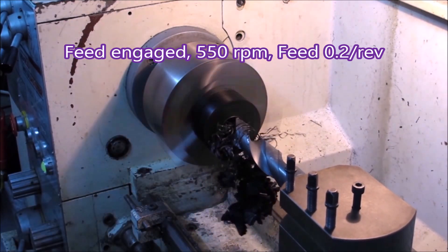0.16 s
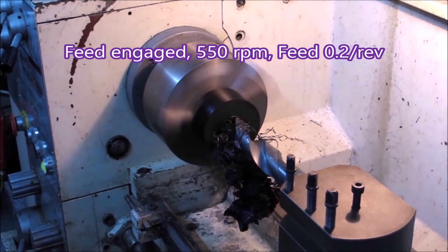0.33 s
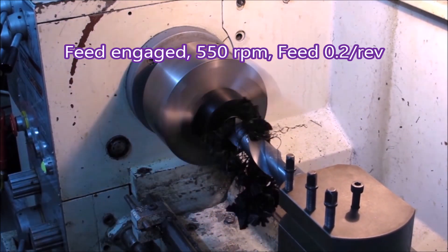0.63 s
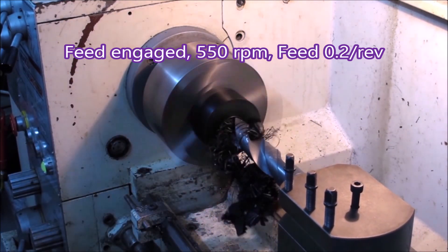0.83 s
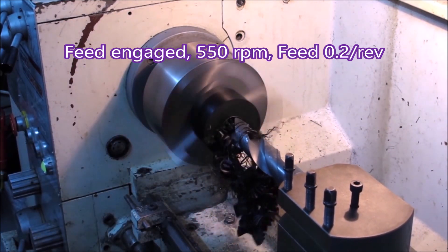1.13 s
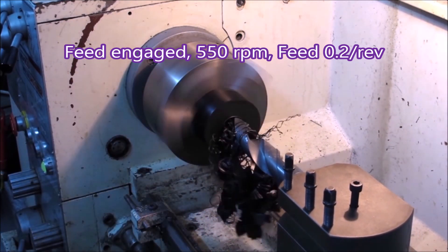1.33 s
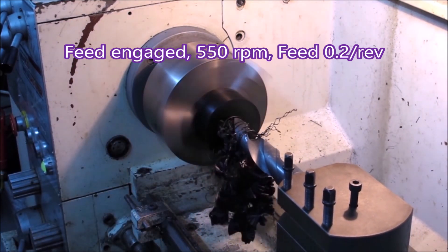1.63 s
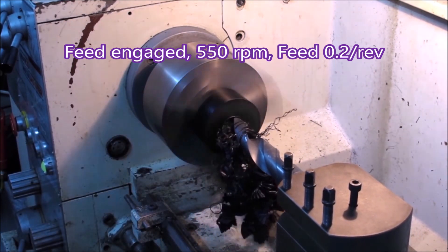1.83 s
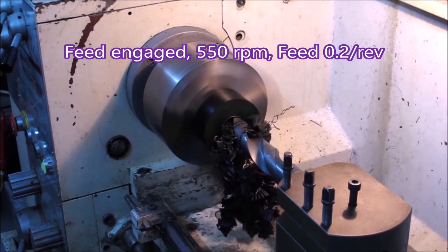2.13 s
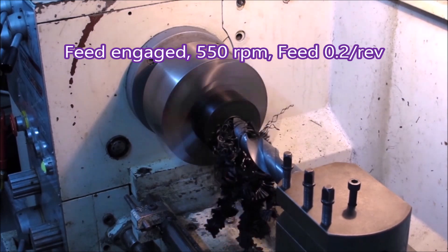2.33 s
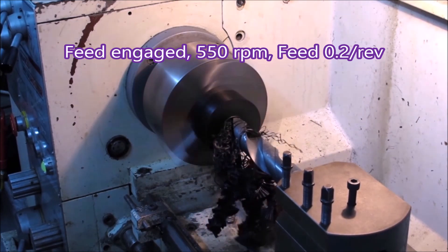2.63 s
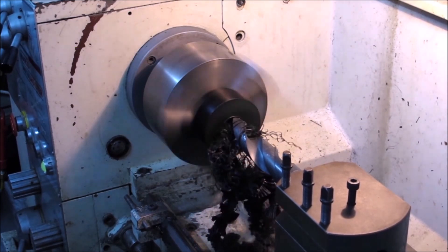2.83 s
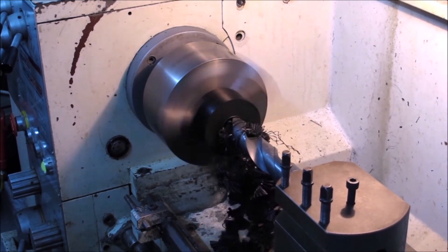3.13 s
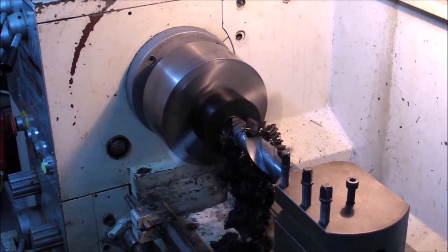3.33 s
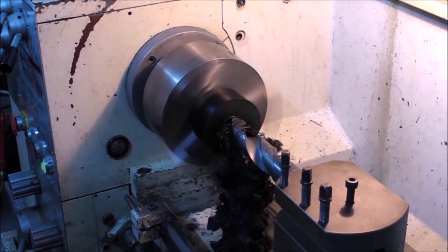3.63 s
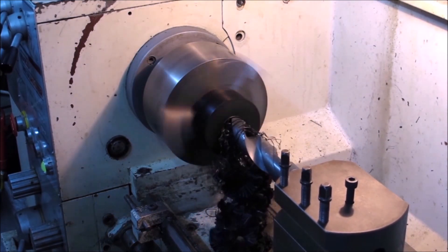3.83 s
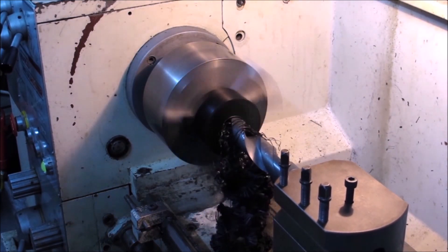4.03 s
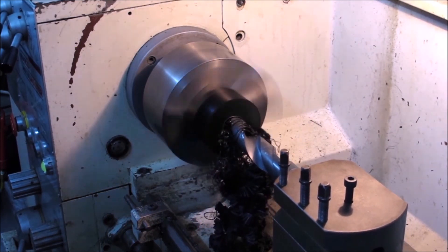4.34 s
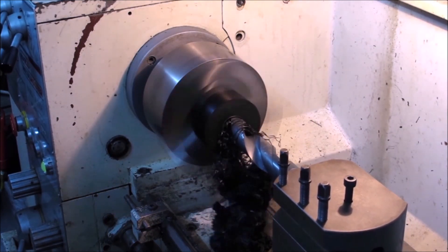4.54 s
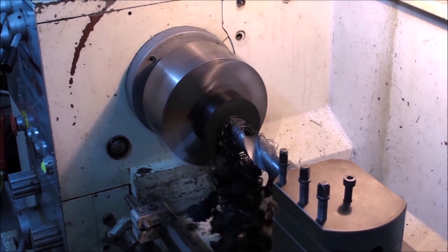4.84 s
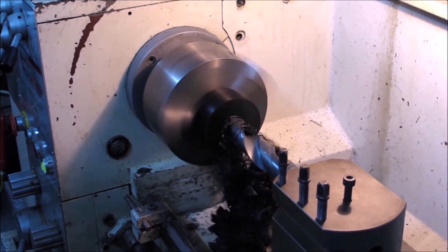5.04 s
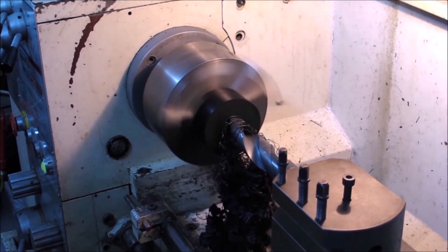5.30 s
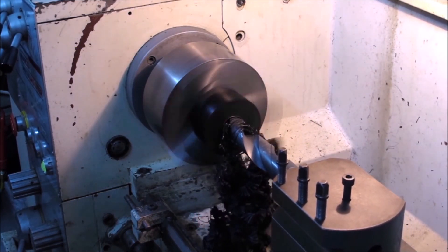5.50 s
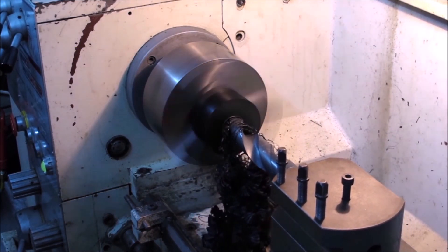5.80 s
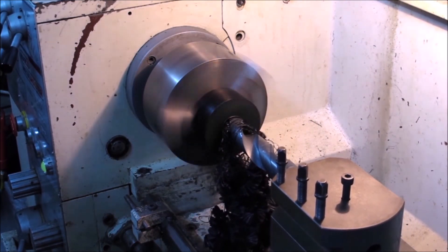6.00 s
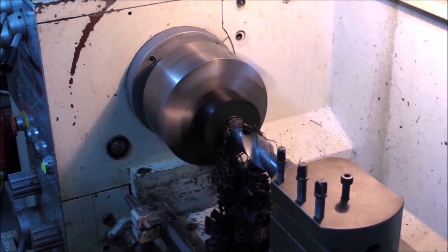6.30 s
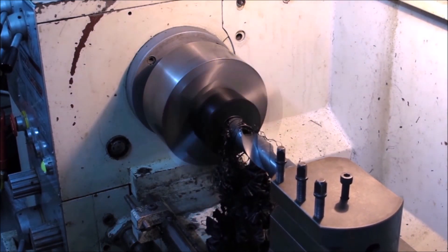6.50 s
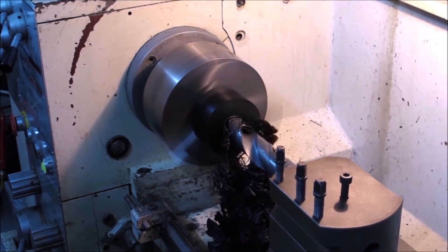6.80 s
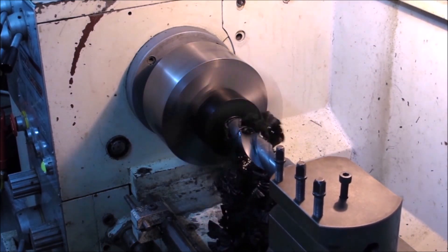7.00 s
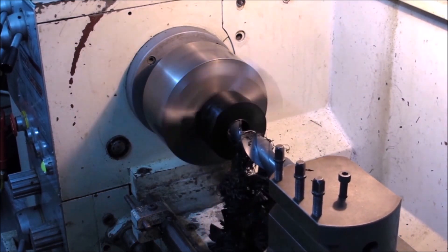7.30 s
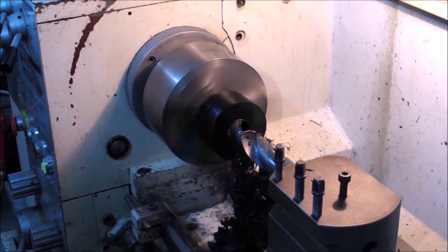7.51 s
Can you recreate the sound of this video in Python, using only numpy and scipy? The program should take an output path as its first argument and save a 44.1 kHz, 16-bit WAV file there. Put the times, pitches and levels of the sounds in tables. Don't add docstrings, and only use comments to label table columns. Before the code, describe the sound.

Close stereo inside a metal lathe cabinet: gears and motor drone steadily while a large drill bites into spinning plastic. A piercing high squeal stutters early, a chip slaps the tool holder, then dense bright hissing and rubbing continues as swarf clogs and clears. Near the end the drill tears through with a rasp and dull thud, cutting stops at once, and light chips tick on sheet metal over free-running gears.

```python
import sys
import numpy as np
from scipy import signal
from scipy.fft import rfft, irfft, next_fast_len
from scipy.io import wavfile
from scipy.ndimage import uniform_filter1d, map_coordinates

SR = 44100
rng = np.random.default_rng(int(sys.argv[2]) if len(sys.argv) > 2 else 0)


def wav_record(signal):
    frames = np.transpose(np.atleast_2d(signal))
    bounded = np.clip(frames, -1, 1)
    quanta = np.round(bounded * 32767).astype(np.int16)
    wavfile.write(sys.argv[1], SR, quanta)


def invert_db(level):
    return 10 ** (np.asarray(level, dtype=float) / 20)


N = 337563
TIME = np.arange(N) / SR

# (time [s], pitch [Hz], level [dB])
SQUEAL = [(0, 5365, -62.5), (.3, 5326, -65), (.5, 5398, -57.5), (.6, 5370, -48.5), (.93, 5363, -39.5),
          (1.5, 5366, -39), (1.6, 5328, -46.5), (2.42, 5382, -49.5), (2.68, 5353, -44.5),
          (3.3, 5389, -54.5), (4.2, 5333, -55.5), (4.75, 5355, -52.5), (6.2, 5369, -64.5),
          (6.6, 5312, -54.5), (6.85, 5261, -54.5), (7.03, 5270, -43), (7.1, 5212, -53.5), (7.24, 5130, -54)]
# (time [s], depth [dB])
SKIPS = [(.63, 11.5), (.69, 35), (.79, 22), (.892, 16.5), (.945, 3), (1, 12), (1.055, 7.5), (1.115, 7.5),
         (1.178, 12), (1.215, 7), (1.242, 12), (1.341, 13.5), (1.372, 4.5), (1.407, 10.5), (1.47, 22),
         (1.492, 10.5), (1.53, 10.5), (1.558, 8)]
# (time [s], rise [dB])
FLARES = [(.04, 9.5), (2.32, 6.5), (2.62, 4), (3, 4), (3.42, 8), (3.85, 3), (4.37, 11.5), (4.72, 7),
          (4.86, 3), (5.53, 8.5), (2.76, 4), (4.15, 4), (6.58, 4), (6.25, 4)]
# (time [s], level [dB])
BITE = [(0, -8), (.45, -6), (.59, 2), (.68, -6), (.82, 0), (1.7, 0), (2.55, 1), (4.3, 1), (5.4, 1.5),
        (6.3, 0.5), (6.77, 2.5), (6.93, 0), (7.16, 4.5), (7.3, 4.5)]
# (time [s], muffling [dB], build-up [s])
CLEARS = [
    (2.3, 5, 0.404),
    (4.05, 4.5, 0.63),
    (4.45, 1.5, 0.11),
    (5.98, 8.5, 0.57),
]
# (time [s], shift [Hz])
TIP_SAG = [(0, 0), (.3, 90), (.42, 0), (.55, -260), (.62, -60), (.8, -220), (.95, 0), (7.3, 0)]
# (centre [Hz], width [Hz], first voice [dB], second voice [dB], left over right [dB])
FLANK_MODES = [(3980, 80, -4, -7, 0), (4300, 300, -12, -3, -1), (4650, 350, -11, -1, -1),
               (5000, 300, -10, -5, -1), (5640, 200, 0, 0, -5), (5900, 400, -4, -6, 0),
               (6400, 500, -9, -10, -1), (7000, 500, -10, -12, 1), (7500, 300, -7, -7, -1)]
LIP_MODES = [(8250, 200, 0, -5, 1), (8600, 250, -6, -6, -1), (9050, 170, -2, 0, 5), (9500, 250, -5, -6, 0)]
MARGIN_MODES = [(10130, 150, -6, -7, 3), (10300, 120, -9, -6, -3), (10670, 150, -2, -5, 4),
                (11180, 150, 0, 0, -5), (11500, 300, -5, -5, -1)]
TIP_MODES = [(11900, 180, -5, -1, -3), (12270, 200, -1, 0, -9), (12480, 150, -2, -6, -11),
             (12700, 220, -1, -3, -8), (12950, 200, -4, -10, -9), (13300, 200, -11, -7, -6),
             (13640, 120, -8, -6, -14), (13930, 200, -8, -3, -13), (14200, 150, 2, -6, -12),
             (14480, 170, -4, -9, -13), (15000, 300, -16, -15, -10), (15500, 500, -40, -19, -11)]
TEAR_MODES = [(1620, 250, -30, -5, 0), (1950, 200, -24, -1, -1), (2500, 600, -16, -6, 0),
              (2950, 250, -9, 1, 0), (3450, 300, -3, 2, 0), (3800, 300, -1, -3, 0), (4200, 250, 0, -2, 0)]
RASP_MODES = [(6470, 1320, -2.5, -6, -0.5), (7590, 510, 12.5, 4.5, -2), (5555, 560, 4, 1.5, -0.5),
              (14840, 820, 5, -12, -16)]
# (centre [Hz], width [Hz], first [dB], second [dB], left over right [dB])
THUD_MODES = [(520, 120, 0, 0, 0), (820, 200, -4, -4, 0), (1150, 400, -6, -6, 0), (330, 100, -8, -8, 0)]
# (time [s], peak [dB], ring [Hz])
SLAPS = [(1.6615, -29, 4200), (1.6635, -32, 3900), (1.667, -27, 3100), (1.669, -34, 4300),
         (1.6715, -37, 2400), (1.686, -37, 4200)]
# (time [s], peak [dB], left over right [dB])
PATTER = [
    (7.2782, -42, -10.5),
    (7.3192, -49, -11),
    (7.384, -54.5, -9.5),
    (7.4504, -44, -8),
]
# (time [s], pitch [Hz], level [dB])
MESH = [(0, 922, -52.5), (.34, 923, -50), (.8, 922, -52), (1.4, 922, -51.5), (2, 922.3, -49.5),
        (2.7, 922, -50.5), (4.2, 921.5, -50), (4.9, 920, -51.5), (6.4, 919.5, -50), (6.92, 909, -57.5),
        (7.03, 904, -62.5), (7.08, 900, -84), (7.2, 930, -75), (7.28, 941, -63), (7.34, 942, -70.5),
        (7.4, 942, -62), (7.65, 943, -61)]
# (pitch [Hz], level [dB])
GEARS = [(662.1, -71), (721.4, -75), (850.6, -74.5), (920.5, -51), (1093, -61.5), (1351, -74), (1550, -73),
         (1637, -77), (1669, -76.5), (1717, -117), (1841, -67.5), (2040, -72.5), (2729, -73.5), (3305, -70),
         (3671, -79.5)]
# (pitch [Hz], level [dB])
HUM = [(199.2, -70), (253.0, -82.5), (398.4, -71.5), (527.6, -75)]
# (time [s], level [dB])
MOTOR = [(0, -58.5), (1.4, -58.5), (2, -56.5), (6.3, -57), (6.9, -61.5), (7.05, -62.5), (7.3, -66),
         (7.65, -62.5)]
# (frequency [Hz], density [dB per Hz])
CABINET = [(15, -66), (25, -26.5), (146, -19.5), (196, -18.5), (311, -19.5), (393, -18), (785, -13),
           (910, -7.5), (1010, -11), (1100, -8.5), (1270, -16.5), (1860, -13), (3280, -18), (3490, -24.5),
           (3800, -18.5), (4940, -78), (8360, -120)]
# (frequency [Hz], density [dB per Hz])
IDLE_AIR = [(1470, -62.5), (2500, -18), (2850, -0.5), (3150, -4), (3670, -10.5), (4540, -10), (6610, -12.5),
            (15600, -12.5)]
# (frequency [Hz], lead [rad])
LEFT_LEAD = [(0, 0), (3800, 0), (4800, -.4), (5350, -.9), (6500, -.1), (7600, -.9), (8270, -1), (8600, .4),
             (9000, -.5), (10000, -1), (11000, -2.6), (12000, -2.3), (12600, -1.8), (13400, -2.4),
             (14100, -1.6), (15300, -2.8)]
# (frequency [Hz], likeness [0-1])
ALIKE = [(30, 0.61), (200, 0.39), (400, 0.49), (1000, 0.36), (3000, 0.55), (6000, 0.29), (15000, 0.7)]

FULL_DB = (-50.5, -50, -48, -44.5)
FOLLOWS_BITE = (0.48, 1.34, 0.445, 0.037)
FEELS_SWARF = (0.23, 1, 0.24, -0.107)
FLARE_S, CLEAR_S = 0.0142, 0.118
BURY_S, BARE_FLANK_DB, BARE_MARGIN_DB = (0.7, 2.5), -6.5, -3
POLISH_S, POLISH_DB = (4.98, 5.02), -3
HUSH_FROM_DB, HUSH_SHARE = -45.5, 0.62
THINNING_S, THIN_TIP_DB = (6.42, 6.66), -3.5
TEAR_S, EXIT_S, STOP_DB_PER_S = (7.05, 7.11), 7.2, 593
RASP_DB, RIP_LEAP_DB = -48.5, 13.5
RIP_DB, RASP_LEAP_DB, RIP_EASES_DB = -56, 8, 3
THUD_S, THUD_DB, THUD_DB_PER_S = (7.1, 7.175), -54.5, 92.5
LINGER_DB, LINGER_DB_PER_S = -15.5, 201
SHAFT_HZ = 50.8
TURN_HZ, RUNOUT_S, RUNOUT_HZ, RUNOUT_DB = 9.17, .995, 12, 1
BITE_IN_S, SEATED_S, DEEP_S, NEAR_END_S = (.45, .7), (1.95, 2.5), (4, 5), (6.1, 7)
AIR_RETURNS_S, AIR_RETURNS_DB = (7.3, 7.6), 3


def cutting():
    places = (FLANK_MODES, LIP_MODES, MARGIN_MODES, TIP_MODES)
    grains_db = (1.59, 1.4, 0.41, 0.25)
    parts = []
    for db, wear, modes, grain_db in zip(rubbing_db(), voices(), places, grains_db):
        level = invert_db(db + 0.677 * wobble(9) + grain_db * wobble(130))
        parts.append(level * ring(modes, np.clip(wear, 0, 1), patchy_db=1.1135))
    *lower, tip = parts
    rub = sum(lower) + shifted(tip, curves(TIP_SAG)[0])
    ripple_db = 0.61 * np.sin(2 * np.pi * 47.0 * TIME) + 0.078 * np.sin(2 * np.pi * 20.0 * TIME)
    ripple_db = ripple_db + 0.146 * wobble(14)
    return rub * invert_db(ripple_db + 0.8 * wobble(400))


def rubbing_db():
    bare = 1 - ramp(*BURY_S)
    hush = np.clip(curves(SQUEAL)[1] - HUSH_FROM_DB, 0, None)
    flank = BARE_FLANK_DB * bare + POLISH_DB * ramp(*POLISH_S)
    lip = 0 * bare
    margin = BARE_MARGIN_DB * bare
    tip = THIN_TIP_DB * (ramp(*THINNING_S) - ramp(*TEAR_S)) - HUSH_SHARE * hush
    shared = np.outer(FOLLOWS_BITE, curves(BITE)[0]) - np.outer(FEELS_SWARF, swarf_db())
    return np.array(FULL_DB)[:, None] + shared + [flank, lip, margin, tip] + freed_db()


def voices():
    bitten, seated, deep, thin = (ramp(*span) for span in (BITE_IN_S, SEATED_S, DEEP_S, NEAR_END_S))
    flank = .04 + .96 * seated - .35 * thin
    lip = 1 - 0.807 * bitten - .25 * seated + .9 * deep
    margin = .1 + .3 * seated + .6 * ramp(SEATED_S[1], DEEP_S[1]) - 0.22 * thin
    tip = 0.077 + 1.5 * bitten - .25 * thin - .03 * swarf_db()
    return [flank, lip, margin, tip]


def swarf_db():
    total = 0
    for s, db, build_s in CLEARS:
        packing = np.exp(np.minimum(TIME - s, 0) / build_s)
        total = total + db * np.where(TIME < s, packing, 1 - ramp(s, s + CLEAR_S))
    return total


def freed_db(linger_db=-60):
    after = np.clip(TIME - EXIT_S, 0, None)
    return np.maximum(-STOP_DB_PER_S * after, linger_db - LINGER_DB_PER_S * after)


def squeal():
    hz, db = curves(SQUEAL)
    late = np.clip((TIME - 6.45) / .4, 0, 1)
    ragged = np.where((TIME > .55) & (TIME < 1.55), .04, .36 - .2 * late)
    skips = sum(depth_db * np.exp(-((TIME - s) / 0.00557) ** 2) for s, depth_db in SKIPS)
    flares = sum(rise_db * np.exp(-((TIME - s) / FLARE_S) ** 2) for s, rise_db in FLARES)
    chance = unit(wobble(70)) + 1j * unit(wobble(70)) + .5 * (wobble(200) + 1j * wobble(200))
    shaft = 2 * np.pi * SHAFT_HZ * TIME
    shake_db = (.9 + 5 * ragged + 2.5 * late) * np.sin(shaft)
    turn = 2 * np.pi * TURN_HZ * (TIME - RUNOUT_S)
    runout = np.cos(turn) + .5 * np.cos(2 * turn)
    hz = hz + RUNOUT_HZ * runout + 60 * late * np.cos(shaft)
    song = tone(hz, rough_db=-0.09, drift_hz=4)
    song = song * (np.sqrt(1 - ragged) + np.sqrt(ragged / 2) * chance)
    song = song * invert_db(db + flares - skips + freed_db() + shake_db - RUNOUT_DB * runout)
    left = invert_db(-0.22) * (song * np.exp(-.45j)).real
    right = invert_db(2.5) * (song * np.exp(.45j)).real
    return np.array([left, right])


def breakthrough():
    thin, torn = ramp(*THINNING_S), ramp(*TEAR_S)
    thud_fall_db = THUD_DB_PER_S * np.clip(TIME - THUD_S[1], 0, None)
    thud = ramp(*THUD_S) ** 2 * invert_db(THUD_DB - thud_fall_db)
    rip = thin * invert_db(RIP_DB + RIP_LEAP_DB * torn + freed_db(LINGER_DB))
    rip = rip * invert_db(-RIP_EASES_DB * ramp(TEAR_S[1], EXIT_S))
    rasp = thin * invert_db(RASP_DB + RASP_LEAP_DB * torn + freed_db(2 * LINGER_DB))
    opened = np.clip((TIME - 7.07) / .08, 0, 1)
    out = np.zeros((2, N))
    for gain, modes in zip((thud, rip, rasp), (THUD_MODES, TEAR_MODES, RASP_MODES)):
        out += gain * invert_db(2.08 * wobble(120)) * ring(modes, opened, patchy_db=-0.5, skirt=1.19)
    return out


def chips():
    slaps, t = np.zeros((2, N)), np.arange(SR // 8) / SR
    for s, db, hz in SLAPS:
        slap = invert_db(db - 60 * t / 0.00395) * np.sin(2 * np.pi * hz * t)
        slaps[:, round(s * SR):][:, :len(t)] += slap
    patter = np.zeros((2, N))
    for s, db, pan_db in PATTER:
        after = np.clip(TIME - s, 0, None)
        sides_db = np.array([[pan_db / 2], [-pan_db / 2]])
        patter += invert_db(db - 16.5 - 60 * after / 0.124 + sides_db) * (TIME >= s)
    sheet = [(6000, -31.5), (9500, -7), (13000, 8.5), (16000, 0)]  # (frequency [Hz], density [dB per Hz])
    return slaps + patter * rush(lambda hz: invert_db(along(sheet, hz)), patchy_db=-0.5)


def machine():
    mesh_hz, mesh_db = curves(MESH)
    main_hz, main_db = max(GEARS, key=lambda row: row[1])
    gears = np.zeros(N)
    for hz, db in GEARS:
        under_db = db - main_db
        rough_db = 0.117 - 0.1053 * under_db
        gears += invert_db(under_db) * tone(mesh_hz * hz / main_hz, rough_db, drift_hz=hz / 700).real
    hum = sum(invert_db(db + 56) * tone(hz, rough_db=1.0, drift_hz=0.423).real for hz, db in HUM)
    rumble = rush(lambda hz: invert_db(along(CABINET, hz)), patchy_db=1.5)
    motor = invert_db(curves(MOTOR)[0]) * (invert_db([[-1.4], [1.4]]) * hum + rumble)
    air = rush(lambda hz: invert_db(along(IDLE_AIR, hz)), patchy_db=4.0)
    air = invert_db(-65 + AIR_RETURNS_DB * ramp(*AIR_RETURNS_S)) * air
    return invert_db([[-.6], [.6]]) * invert_db(mesh_db) * gears + motor + air


def ring(modes, depth, patchy_db, skirt=1.297):
    centre, width, first_db, second_db, pan_db = np.transpose(modes)
    level = invert_db(np.array([first_db, second_db])[:, None] + np.outer([.5, -.5], pan_db))

    def gain(hz):
        detune = 2 * (hz - centre[:, None]) / width[:, None]
        return np.sqrt(level ** 2 @ (1 + detune ** 2) ** -skirt)

    first, second = rush(gain, patchy_db)
    return (1 - depth) * first + depth * second


def rush(gain, patchy_db):
    z = signal.stft(rng.standard_normal((2, N)), nperseg=512)[2]
    field = uniform_filter1d(rng.standard_normal(z.shape[1:]), size=4, axis=0)
    field = uniform_filter1d(field, size=8, axis=1)
    pair = signal.istft(z * invert_db(patchy_db * unit(field)), nperseg=512)[1][:, :N]
    m = next_fast_len(N + 8192)
    hz = np.fft.rfftfreq(m, 1 / SR)
    a, b = rfft(pair, m)
    turn = np.arccos(np.clip(along(ALIKE, hz), 0, 1)) / 2
    shift = np.exp(.5j * np.interp(hz, *np.transpose(LEFT_LEAD)))
    left = (a * np.cos(turn) + b * np.sin(turn)) * shift
    right = (a * np.cos(turn) - b * np.sin(turn)) / shift
    x = irfft(np.array([left, right]) * gain(hz), m)[..., :N]
    middle = x.mean(-2, keepdims=True)
    return x / np.sqrt(np.mean(middle ** 2, axis=-1, keepdims=True))


def tone(hz, rough_db, drift_hz):
    phase = 2 * np.pi * np.cumsum(hz + drift_hz * wobble(25)) / SR
    return invert_db(rough_db * wobble(30)) * np.sqrt(2) * np.exp(1j * (phase + rng.uniform(0, 2 * np.pi)))


def shifted(x, hz):
    analytic = signal.hilbert(x, next_fast_len(N))[..., :N]
    return (analytic * np.exp(2j * np.pi * np.cumsum(hz) / SR)).real


def wobble(rate):
    coarse = TIME[::16]
    knots = rng.standard_normal(int(N * rate / SR) + 4)
    return np.interp(TIME, coarse, map_coordinates(knots, [coarse * rate]))


def ramp(start_s, end_s):
    return np.clip((TIME - start_s) / (end_s - start_s), 0, 1)


def curves(rows):
    s, *cols = np.transpose(rows)
    return [np.interp(TIME, s, c) for c in cols]


def along(points, hz):
    f, v = np.transpose(points)
    return np.interp(np.log(hz + 1), np.log(f + 1), v)


def unit(x):
    return x / np.sqrt(np.mean(x ** 2) + 1e-20)


def scene():
    return cutting() + squeal() + breakthrough() + chips() + machine()


def roll_off(x):
    return signal.sosfilt(signal.butter(12, 15740, fs=SR, output="sos"), x)


def record(dry):
    return roll_off(dry)


dry = scene()
out = record(dry)
wav_record(out)
```